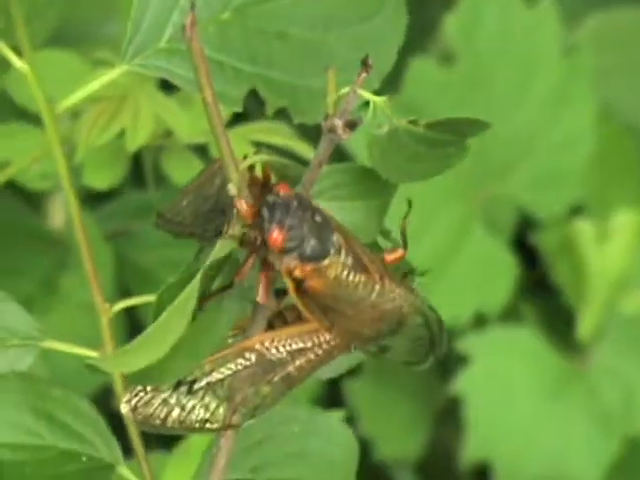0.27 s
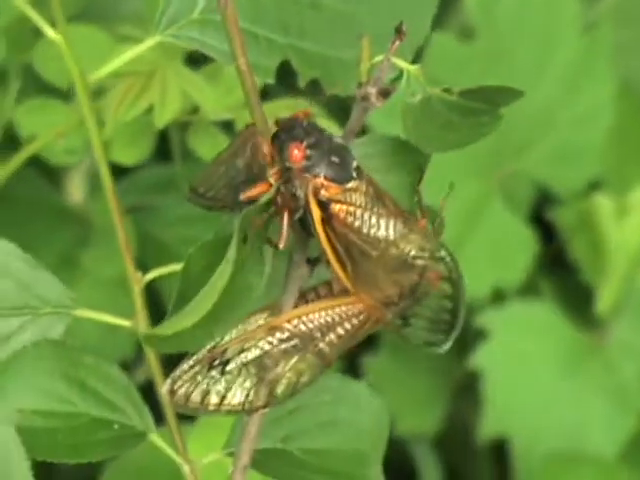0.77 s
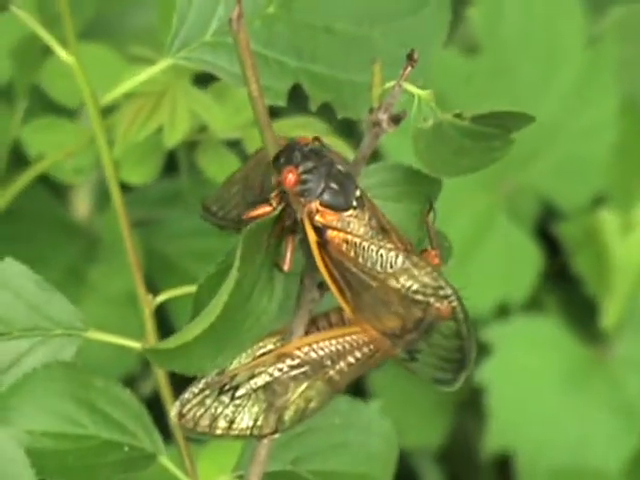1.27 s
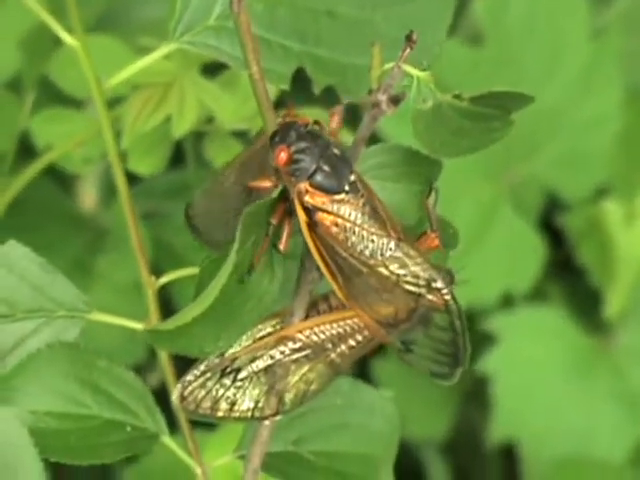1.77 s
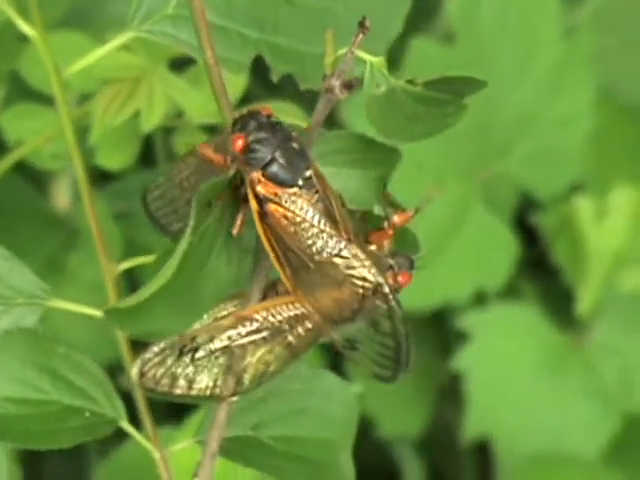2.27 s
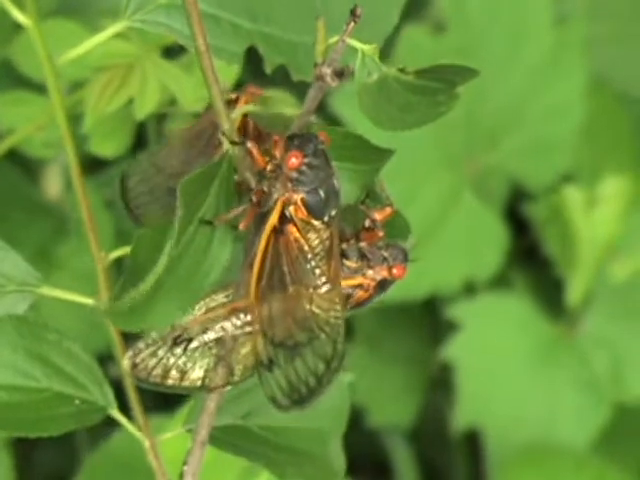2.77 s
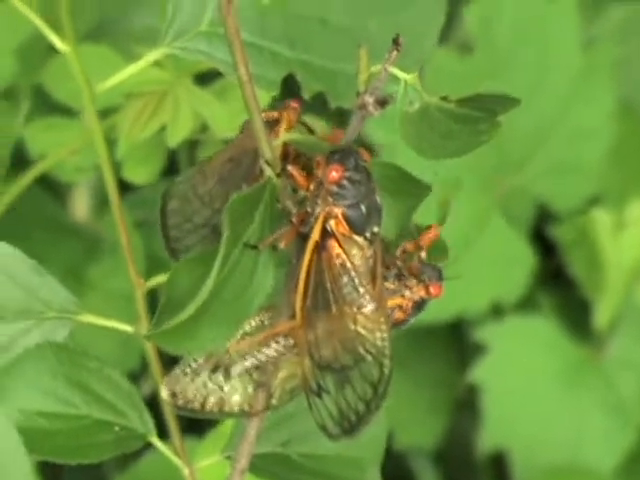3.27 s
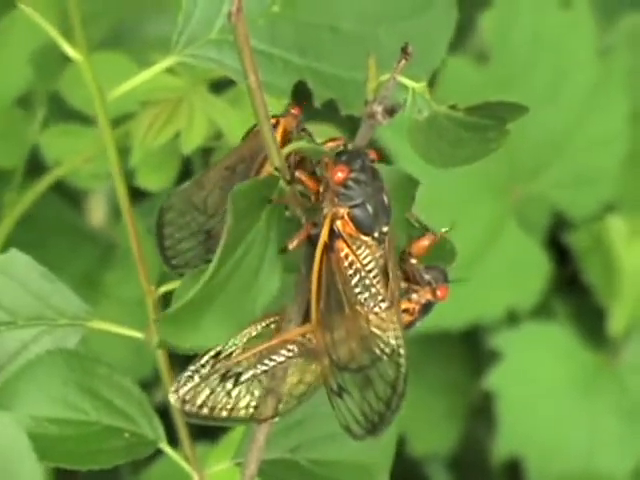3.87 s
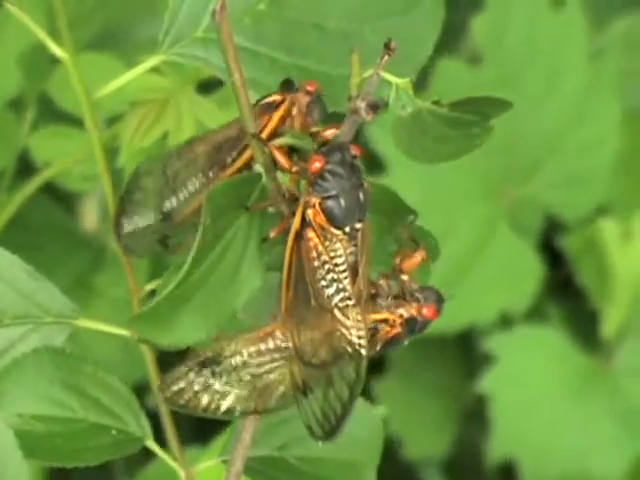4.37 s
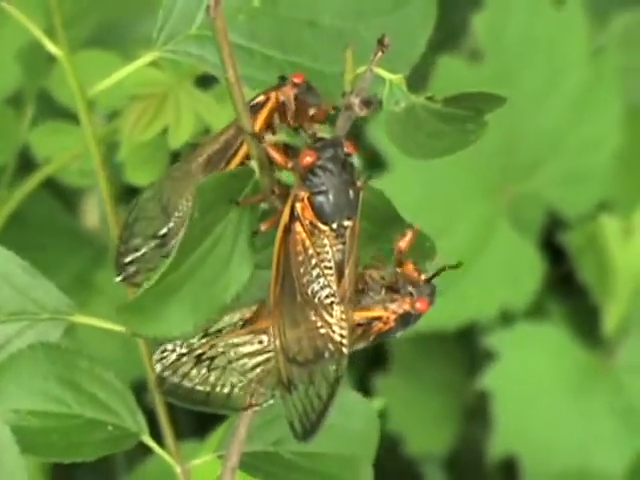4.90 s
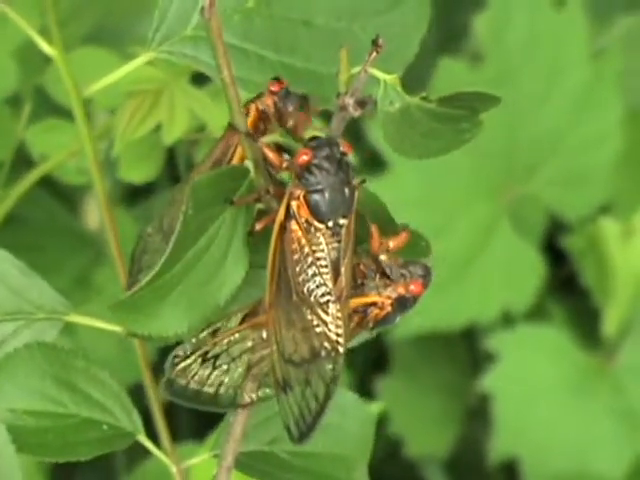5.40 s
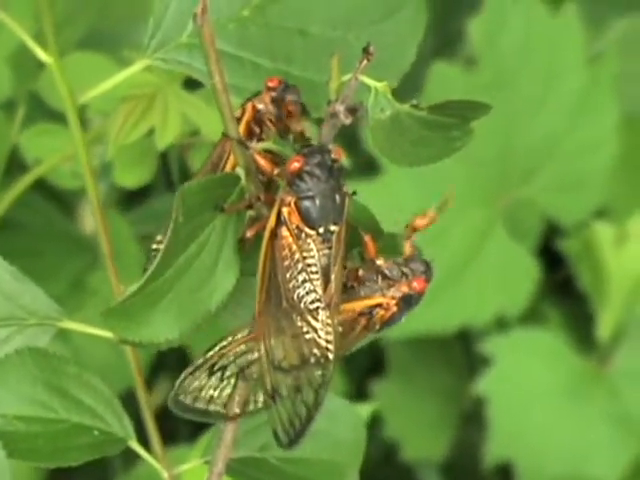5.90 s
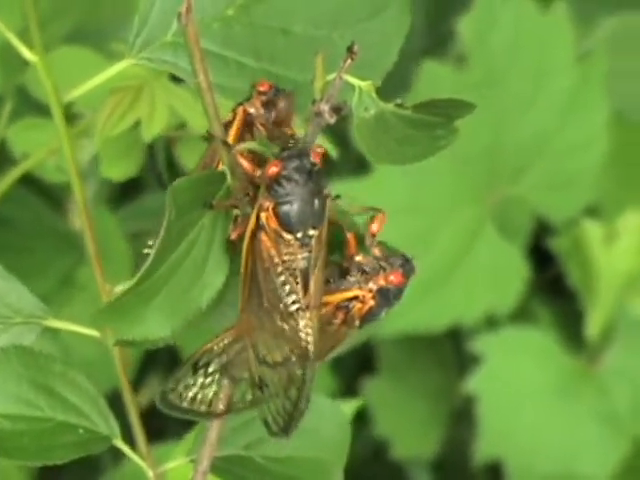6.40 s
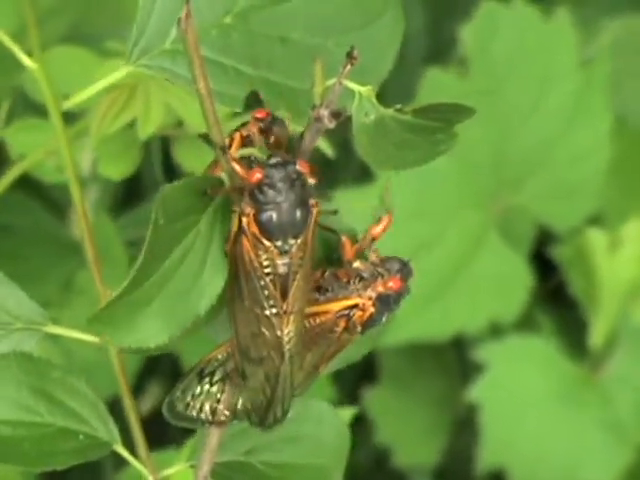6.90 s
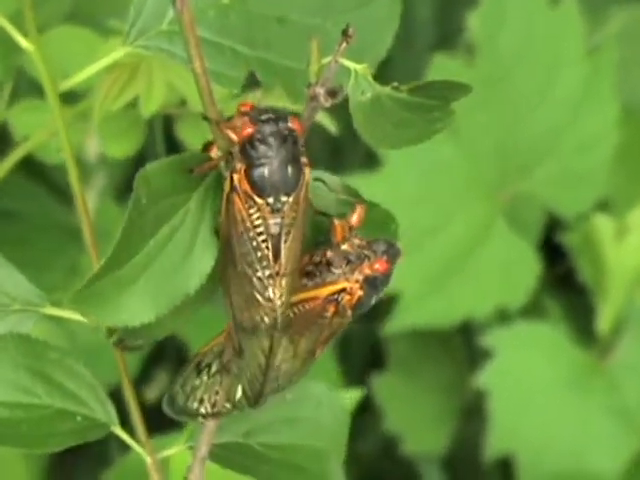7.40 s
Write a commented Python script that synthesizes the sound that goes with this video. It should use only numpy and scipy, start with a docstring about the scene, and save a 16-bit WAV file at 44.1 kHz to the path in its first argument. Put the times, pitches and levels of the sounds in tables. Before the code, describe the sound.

From 0 to about 7.6 seconds a vast chorus of cicadas drones without pause in summer woods. Hundreds of distant males blend into one reedy, whistling band near 1.3 kilohertz, roughened by fast throbbing, small downward slurs and the scattering of the trees. Closer males lift just above it in wavering, arched phrases of about a third of a second, notably near 0.2, 0.9, 1.5, 2.9, 4.4, 5.5 and 6.4 seconds; a sharper small group comes forward around 4 to 4.6 and again near 5.6. A fine broad hiss of other insects ebbs toward 3 seconds, then returns a little brighter after 5. Low wind rumbles steadily with slight soft gusts, and a faint low hum fades by 5. Near 5.65 a tiny dry leaf snap sounds close by, with faint grainy scrapes just after and around 6.7 to 6.9. The wide, diffuse outdoor sound ends still droning.

```python
"""A chorus of periodical cicadas drones in summer woods, over a low rumble of wind.
Hundreds of males hold nearly one pitch and slur down at the end of each phrase; the trees blur them into a band.
A few closer males rise above it as a wavering whistle, each phrase a smooth arch of level.
Shaped noise makes the wind and a hissing chorus of a second kind, which ebbs and swells behind the drone.
Close by, a few climbing cicadas scrape faintly on the leaves and snap off one, in short bursts of noise."""
import sys
import numpy as np
from scipy import signal
from scipy.fft import rfft, irfft, next_fast_len
from scipy.io import wavfile
from scipy.ndimage import uniform_filter1d

SR = 44100
rng = np.random.default_rng(int(sys.argv[2]) if len(sys.argv) > 2 else 0)


def materialize(psi):
    """Save the field psi as 16-bit PCM at rate SR to the path in sys.argv[1].

    A 1-D psi becomes a single channel; in a 2-D psi each row is a channel.
    """
    bounded = np.clip(np.atleast_2d(psi).T, -1, 1)
    quanta = np.round(bounded * 32767).astype(np.int16)
    wavfile.write(sys.argv[1], SR, quanta)


N = 337365
# songs change slowly about their pitch, so they are followed once in this many samples
SLOW = 21
TIME = np.arange(N) / SR
SLOW_TIME = np.arange(N // SLOW + 1) * SLOW / SR


def gain_of(db):
    """Turns decibels into amplitude."""
    return 10 ** (np.asarray(db) / 20)


def evened(x):
    """Scales a sound to an rms (average strength) of one."""
    return x / np.sqrt(np.mean(x ** 2) + 1e-20)


def steadied(x, size):
    """Holds the loudness of each channel even over a span of samples."""
    return x / np.sqrt(uniform_filter1d(x ** 2, size) + 1e-12)


def read(points, hz):
    """Reads a table of f/Hz and level/dB, with straight lines on a log-frequency axis."""
    f, value = np.transpose(points)
    return np.interp(np.log(hz + 1), np.log(f + 1), value)


def curves(rows):
    """Draws each column of a table as a curve over time; the first column is t/s."""
    t, *columns = np.transpose(rows)
    return [np.interp(TIME, t, column) for column in columns]


def wander(shape, step, rate_hz):
    """Smooth random drift of rms one along the last axis, whose points lie step seconds apart."""
    size = next_fast_len(shape[-1])
    smooth = np.exp(-.5 * (np.fft.rfftfreq(size, step) / rate_hz) ** 2)
    noise = rng.standard_normal(shape[:-1] + (size,))
    drift = irfft(rfft(noise) * smooth, size)
    return evened(drift[..., :shape[-1]])


def resonance(noise, hz, width_hz):
    """Passes noise twice through one resonance, which gives it steep skirts."""
    b, a = signal.iirpeak(hz, hz / width_hz, fs=SR)
    return signal.lfilter(b, a, signal.lfilter(b, a, noise))


def band(hz, width_hz):
    """Lasting noise of rms one around a resonance."""
    settled = resonance(rng.standard_normal(N + SR), hz, width_hz)[SR:]
    return evened(settled)


def swells(rows):
    """Smooth swells of rubbing or rushing noise, each in one broad resonance."""
    out = np.zeros(N)
    for t, length, hz, width_hz, db in rows:
        at = np.flatnonzero(abs(TIME - t) < length / 2)
        rush = resonance(rng.standard_normal(2 * SR), hz, width_hz)[:len(at)]
        arch = np.cos(np.pi * (TIME[at] - t) / length)
        out[at] += gain_of(db) * evened(rush) * arch
    return out


# stereo width, as side minus mid: (f/Hz, level/dB)
STEREO_WIDTH = [(40, -21), (110, -28), (200, -14.5), (380, -8.5), (650, -7.5), (1400, -7.5), (2400, -6.5),
                (4400, -9), (7500, -11), (9500, -7), (11500, -26)]
# stereo balance, as left minus right: (f/Hz, level/dB)
LEFT_LEAN = [(60, -0.5), (200, -0.5), (380, 1.5), (700, 1), (1300, -1.5), (2400, 0), (4400, -.5),
             (8000, .1)]


def microphones(pair, colour=None):
    """Two unrelated sounds become one diffuse field at two closely spaced microphones."""
    size = next_fast_len(N)
    hz = np.fft.rfftfreq(size, 1 / SR)
    mid, side = rfft(pair, size)
    side = side * gain_of(read(STEREO_WIDTH, hz))
    lean = gain_of(read(LEFT_LEAN, hz) / 2)
    spectrum = np.array([(mid + side) * lean, (mid - side) / lean])
    if colour is not None:
        spectrum = spectrum * gain_of(read(colour, hz))
    out = irfft(spectrum, size)[:, :N]
    return out / out.mean(0).std()


def woods(offset_hz, effort, pitch_hz, t60, size):
    """Tones stray from a common pitch; trunks and leaves give each singer his own dying tail."""
    songs = effort * np.exp(2j * np.pi * np.cumsum(offset_hz, 1) * SLOW / SR)
    t = SLOW_TIME[:SR // SLOW]
    scatter = np.exp(2j * np.pi * rng.random((len(songs), len(t))))
    tails = scatter * gain_of(-60 * t / t60)  # 60 dB down after t60 seconds
    already_singing = np.pad(songs, ((0, 0), (len(t) - 1, 0)), mode="wrap")
    wet = signal.fftconvolve(already_singing, tails, "valid", axes=1)
    # two unrelated halves of the crowd give it width
    halves = np.array([wet[::2].sum(0), wet[1::2].sum(0)])
    halves = signal.resample_poly(halves, SLOW, 1, axis=1, window=("kaiser", 10))[:, :N]
    common = np.exp(2j * np.pi * np.cumsum(pitch_hz * np.ones(N)) / SR)
    return microphones(steadied((halves * common).real, size))


# colour of the wind and the distant air: (f/Hz, level/dB per Hz)
WIND_COLOUR = [(12, -32), (24, -6), (31, -5), (38, 2.5), (47, -5), (70, -0.3), (88, -.5), (125, -4),
               (165, -8), (200, -10), (290, -15), (460, -18), (650, -17), (950, -15.5), (1700, -21.5),
               (3000, -34.5), (9000, -52.5)]
WIND_DB = -35


def wind(gust_db):
    """A steady low rumble under a soft wash of air in the leaves, made of coloured noise."""
    air = steadied(microphones(rng.standard_normal((2, N)), WIND_COLOUR), size=12000)
    lean = gain_of(read(LEFT_LEAN, 60) * np.array([[.5], [-.5]]))  # the rumble leans a little to the right
    return air * lean * gain_of(WIND_DB + gust_db * wander((N,), 1 / SR, 8.0))


# soft gusts in the rumble: (middle t/s, length t/s, centre f/Hz, width f/Hz, level/dB)
SOFT_GUSTS = [(0.25, 0.43, 169, 130, -48), (1.26, 0.34, 150, 70, -43.5), (4.5, 0.75, 142, 22, -41.5),
              (4.66, 0.23, 188, 95, -44), (6.72, 0.2, 165, 85, -41.5)]


def gusts():
    """Each gust is a short swell of low rushing noise."""
    return swells(SOFT_GUSTS)


# a faint low hum in the rumble: (f/Hz, width f/Hz, level/dB)
HUM_TONES = [(88, 5.5, -46.5), (109.1, 6, -50.5), (168.4, 9.6, -50.5)]
# how the whole hum dies away: (t/s, level/dB)
HUM_DYING = [(0, 1), (1.8, -0.5), (3.6, -3.5), (5, -11.5), (7.65, -9)]


def hum():
    """Narrow bands of noise make a few blurred low tones that fade into the rumble."""
    tones = sum(gain_of(db) * band(hz, width_hz) for hz, width_hz, db in HUM_TONES)
    return gain_of(curves(HUM_DYING)[0]) * tones


# colour of the hissing chorus: (f/Hz, level/dB per Hz)
BUZZ_COLOUR = [(100, -10), (300, 2.5), (1700, 0.5), (2500, 0.4), (3600, -1.5), (4700, -2), (5500, -4.5),
               (7200, -5.5), (8500, -8.5), (10000, -14.5), (11500, -20.5), (14000, -28), (15500, -50)]
# how hard the hissing chorus sings; it ebbs once and swells again: (t/s, level/dB)
HISS_EFFORT = [(0.0, 0), (0.89, 0), (3.15, -3), (4.77, -2.5), (5.58, -1), (7.65, -1.5)]
# change of the treble in the hiss: (t/s, level/dB)
HISS_TREBLE = [(0, -0.2), (4.2, -0.3), (6.0, 0.8), (7.65, 0.5)]
TREBLE_HZ = 6000


def hiss(level_db, flutter_db, flutter_hz):
    """Countless high buzzes merge into a hiss; it ebbs and swells as the males keep time, and returns brighter."""
    buzz = microphones(rng.standard_normal((2, N)), BUZZ_COLOUR)
    high_pass = signal.butter(2, TREBLE_HZ, "high", fs=SR, output="sos")
    treble = signal.sosfiltfilt(high_pass, buzz)
    buzz = buzz + treble * (gain_of(curves(HISS_TREBLE)[0]) - 1)
    flutter = flutter_db * wander((N,), 1 / SR, flutter_hz)
    return buzz * gain_of(curves(HISS_EFFORT)[0] + level_db + flutter)


# faint scrapes of climbing cicadas: (middle t/s, length t/s, resonance f/Hz, width f/Hz, level/dB)
CLAW_SCRAPES = [(5.688, 0.024, 1960, 807, -38), (5.708, .012, 2295, 1180, -39),
                (5.76, 0.08, 1890, 1500, -41), (6.66, 0.037, 2114, 500, -46), (6.88, 0.23, 2890, 1201, -48)]


def scrapes(grain_db, grain_hz):
    """Claws catch and slip on the leaves, so each scrape is grainy."""
    grain = evened(gain_of(grain_db * wander((N,), 1 / SR, grain_hz)))
    return swells(CLAW_SCRAPES) * grain


# a claw snaps off a leaf: (t/s, level/dB before the rise and the dying away)
CLAW_TICKS = [(5.646, -27), (5.655, -37)]
# the leaf's dull ring: (f/Hz, width f/Hz, level/dB against the other bands)
LEAF_RING = [(3230, 1100, 1), (5000, 1500, -6), (8500, 800, -11)]
TICK_RISE_S, TICK_T60_S = .0015, .016


def ticks():
    """Each snap rises and dies within milliseconds in the leaf."""
    ring = evened(sum(gain_of(db) * band(hz, width_hz) for hz, width_hz, db in LEAF_RING))
    envelope = np.zeros(N)
    for t, db in CLAW_TICKS:
        age = np.clip(TIME - t, 0, 1)
        envelope += np.minimum(age / TICK_RISE_S, 1) * gain_of(db - 60 * age / TICK_T60_S)
    return ring * envelope


# a small group above the common pitch: (t/s, pitch f/Hz, level/dB)
SHARP_GROUP = [(0, 1414, -43), (1.2, 1402, -58), (2.4, 1396, -44), (3.4, 1395, -51), (4.1, 1434, -42.5),
               (4.55, 1435, -42), (5.0, 1407, -46), (5.6, 1414, -41), (6.2, 1390, -45), (7.65, 1379, -54)]


def high_singers(waver_hz, count):
    """A small group of wavering tones sings a little sharp of the drone, its level rising and falling."""
    pitch_hz, level_db = curves(SHARP_GROUP)
    offset_hz = waver_hz * wander((count, len(SLOW_TIME)), SLOW / SR, 4.02)
    return gain_of(level_db) * woods(offset_hz, 1, pitch_hz, t60=0.13, size=8000)


# louder phrases of the nearest group: (middle t/s, length t/s, pitch f/Hz, rise level/dB)
NEAR_PHRASES = [(0.193, .3, 1363, 10.5), (0.7, 0.32, 1393, 7), (0.927, 0.24, 1363, 9.5),
                (1.492, 0.19, 1345, 10), (1.807, 0.36, 1346, 2), (2.88, 0.28, 1347, 9.5),
                (3.63, 0.23, 1375, 7), (4.384, 0.25, 1363, 11), (4.676, .28, 1359, 8.5),
                (5.542, 0.12, 1336, 13), (5.747, 0.37, 1332, 7), (6.414, 0.27, 1347, 11),
                (6.938, .3, 1341, 8.5), (7.566, 0.34, 1342, 9)]
# the group holds this one level between its phrases
NEAR_DB = -46


def near_singers(waver_hz, direct, count):
    """Closer males whistle at the top of the drone, each phrase at its pitch; the nearest is heard directly."""
    rise_db = np.zeros(N)
    for t, length, _, db in NEAR_PHRASES:
        rise_db += db * np.cos(np.pi * np.clip((TIME - t) / length, -.5, .5))
    offset_hz = waver_hz * wander((count, len(SLOW_TIME)), SLOW / SR, 3.975)
    pitch_hz = curves(NEAR_PHRASES)[1]
    nearest_hz = pitch_hz + waver_hz * wander((N,), 1 / SR, 5)
    nearest = evened(np.sin(2 * np.pi * np.cumsum(nearest_hz) / SR))
    group = woods(offset_hz, 1, pitch_hz, t60=0.28, size=4000)
    mix = (group + direct * nearest) / np.hypot(1, direct)
    return gain_of(NEAR_DB + rise_db) * mix


# level of the distant drone, wavering by a few decibels: (t/s, level/dB)
DRONE_LEVEL = [(0, -32.5), (1.0, -32.5), (1.17, -34), (1.42, -33), (1.82, -32.5), (2.08, -35), (2.3, -33),
               (2.48, -35.5), (2.66, -33.5), (3.8, -33.5), (4.35, -34.5), (4.85, -32), (5.1, -34),
               (5.55, -32.5), (5.8, -32), (6.15, -34), (7.0, -33), (7.65, -34.5)]


def far_singers(pitch_hz, spread_hz, slur_hz, slur_share, phrase_s, buckle_hz, throb, waver_hz,
                flutter_db, count):
    """Each abdomen rings at its own drifting pitch, throbs as its tymbals buckle, and sags as a phrase ends."""
    start, pace, buckle, sag = rng.random((4, count, 1))
    # place within the phrase, 0 to 1; phrase_s is the shortest phrase, the longest is half as long again
    phrase = (start + SLOW_TIME / (phrase_s * (1 + pace / 2))) % 1
    drift_hz = spread_hz * wander(phrase.shape, SLOW / SR, .5)
    own_hz = drift_hz + waver_hz * wander(phrase.shape, SLOW / SR, 10)
    # the last share of each phrase slides down, deeper for some males
    slur = np.clip((phrase - 1 + slur_share) / slur_share, 0, 1) * (.5 + sag)
    offset_hz = own_hz * (1 - slur / 2) - slur_hz * slur
    effort = np.minimum(1, 20 * np.minimum(phrase, 1 - phrase))  # soft start and end
    # the tymbals are the ribbed drums that make the song
    tymbals = 1 + throb * np.cos(2 * np.pi * buckle_hz * (.5 + buckle) * SLOW_TIME)
    crowd = woods(offset_hz, effort * tymbals, pitch_hz, t60=0.43, size=8000)
    level_db = curves(DRONE_LEVEL)[0] + flutter_db * wander((N,), 1 / SR, 10.6)
    return gain_of(level_db) * crowd


def scene():
    """Adds the low rumble, the hiss, the climbing cicadas and the droning chorus."""
    air = wind(gust_db=0.2) + gusts() + hum()
    hissing = hiss(level_db=-39.5, flutter_db=0.28, flutter_hz=25)
    climbing = scrapes(grain_db=2, grain_hz=150.3) + ticks()
    near = high_singers(waver_hz=18, count=10) + near_singers(waver_hz=14, direct=0.88, count=12)
    far = far_singers(pitch_hz=1313, spread_hz=64, slur_hz=234.8, slur_share=.21, phrase_s=2.2,
                      buckle_hz=131.9, throb=0.59, waver_hz=14, flutter_db=1.0, count=360)
    return air + hissing + climbing + near + far


EDGE_HZ = 15400


def record(dry):
    """The recorder's band limit: a low-pass filter removes what lies above the edge."""
    low_pass = signal.firwin(511, EDGE_HZ, window=("kaiser", 9), fs=SR)
    return signal.oaconvolve(dry, low_pass[None], "same")


dry = scene()
out = record(dry)
materialize(out)
```